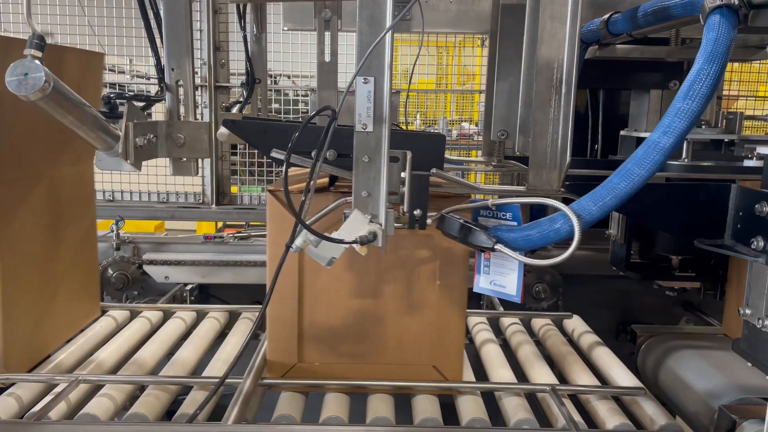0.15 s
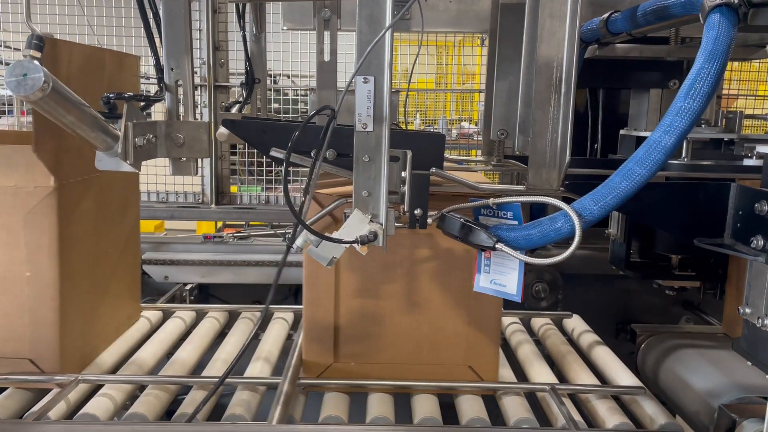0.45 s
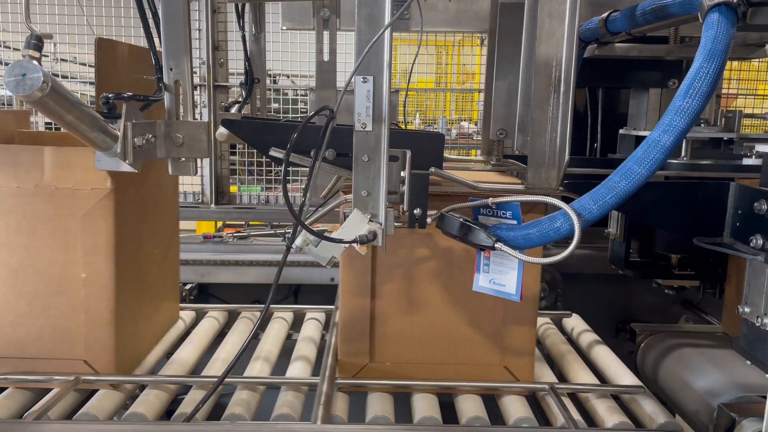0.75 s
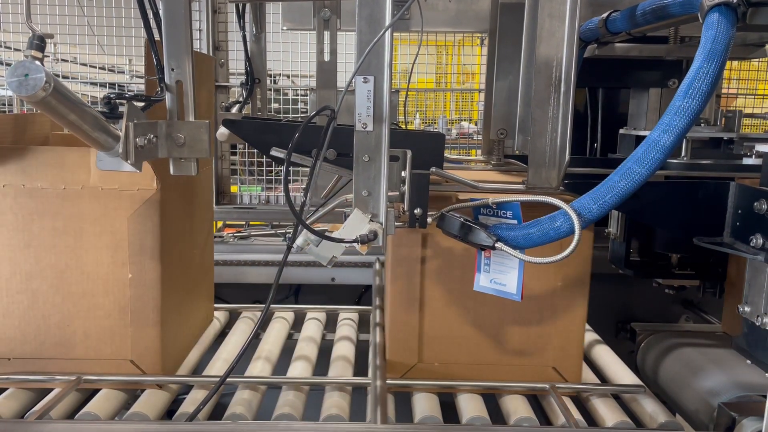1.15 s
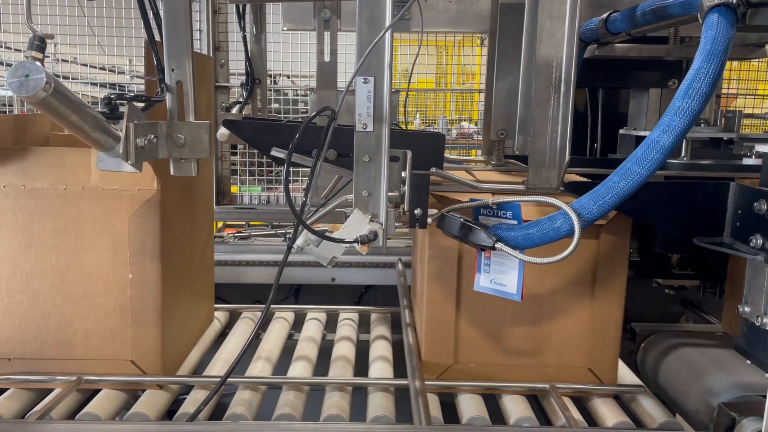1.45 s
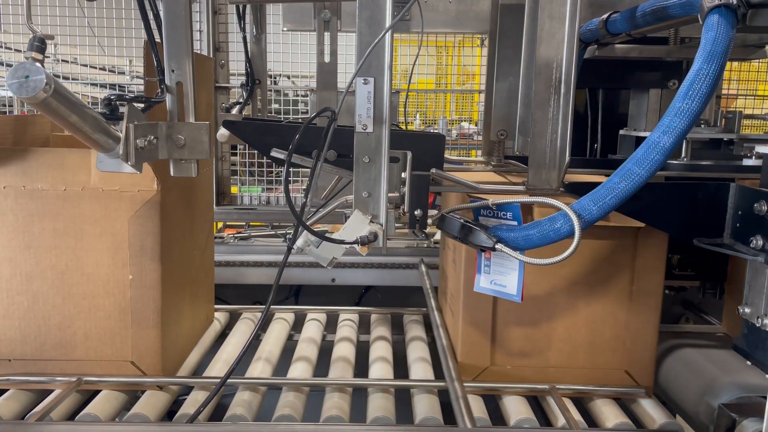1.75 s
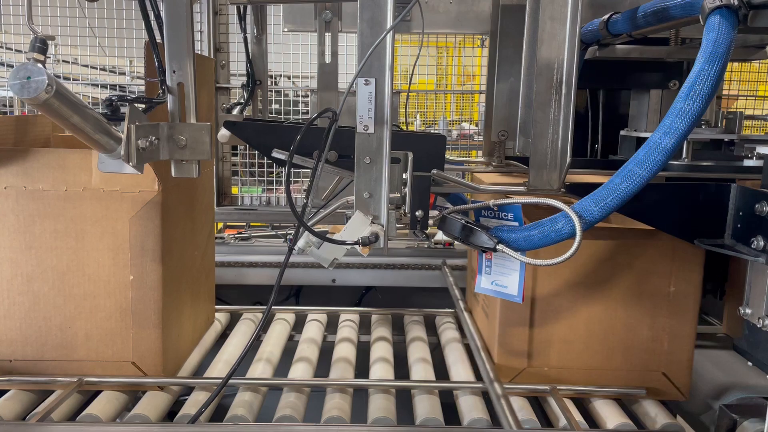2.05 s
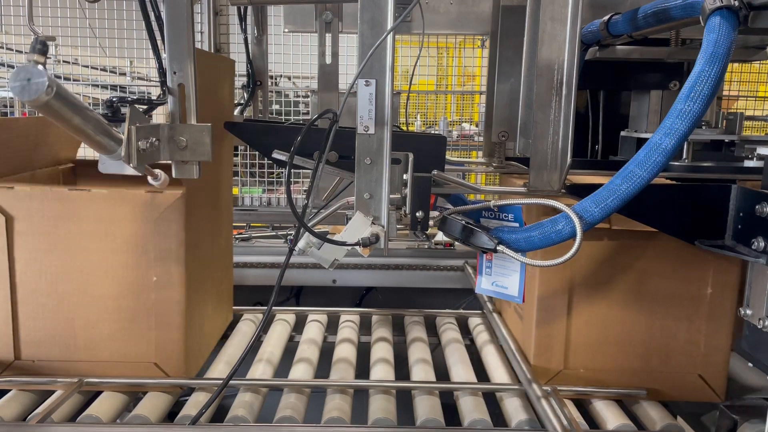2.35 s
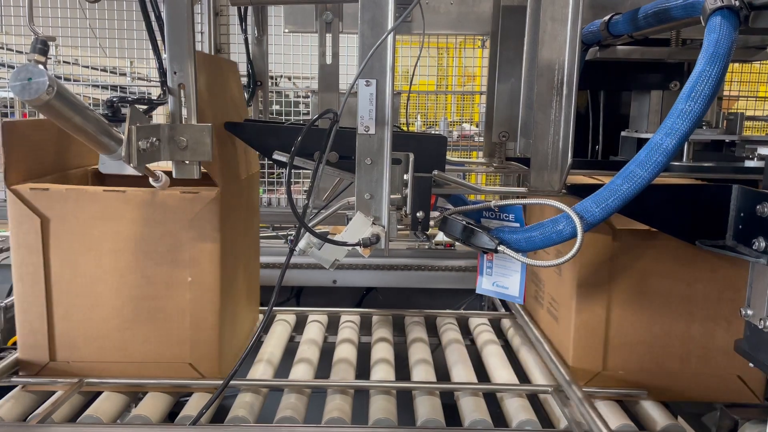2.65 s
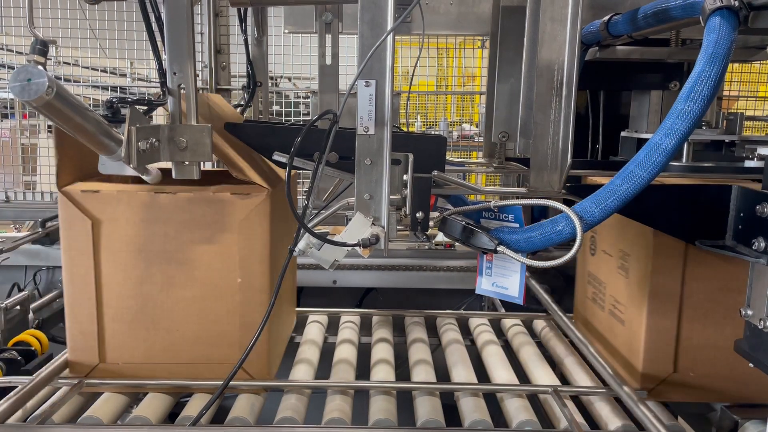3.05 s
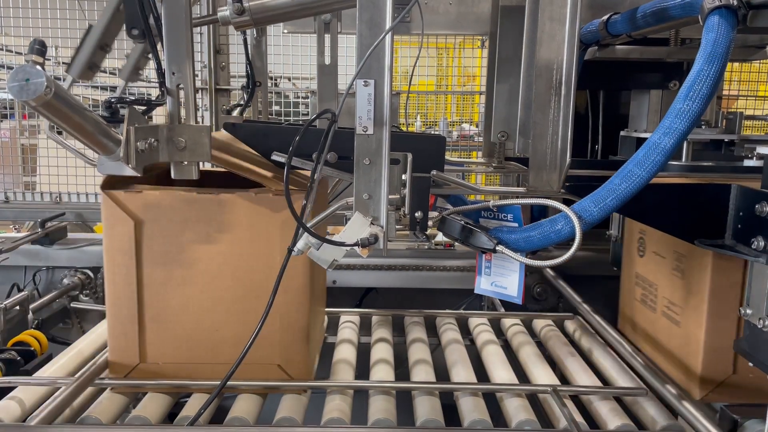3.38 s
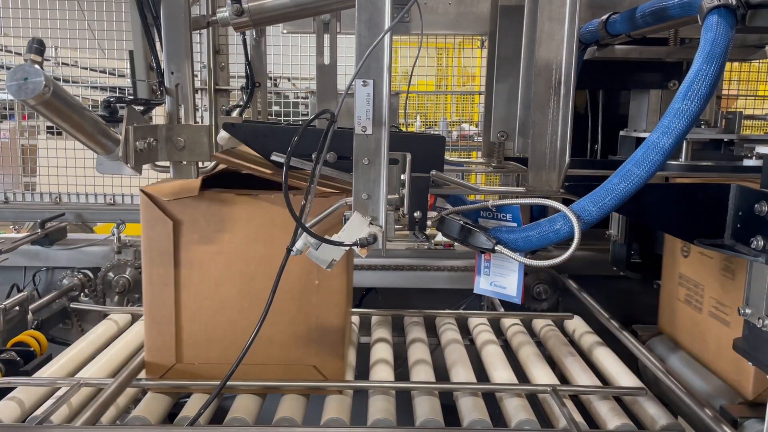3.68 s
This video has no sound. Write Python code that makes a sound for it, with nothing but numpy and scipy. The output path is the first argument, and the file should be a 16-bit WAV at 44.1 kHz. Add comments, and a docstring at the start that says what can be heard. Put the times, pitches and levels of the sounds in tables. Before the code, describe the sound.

Carton sealing machine hums and ticks while valves blast air and a steel arm clanks

```python
"""Factory hall, close to a carton sealer, on a close pair of microphones. Far off, shaped noise rumbles, and
motors and a loaded drive hum as wavering sines. Close by, a chain ticks in noise, cartons and other knocks thud
as decaying sines, a steel arm clanks as ringing modes, and air valves spit, blast, sigh and whistle as gated
noise and sliding tones. A decaying noise tail is the hall's answer; the pair differs in phase and level, which
turns the treble of left against right."""
import sys
import numpy as np
from scipy import signal
from scipy.fft import rfft, irfft, next_fast_len
from scipy.io import wavfile
from scipy.ndimage import map_coordinates

SR = 44100
rng = np.random.default_rng(int(sys.argv[2]) if len(sys.argv) > 2 else 0)


def dump(signal):
    """Clip the signal to [-1, 1] and save it as 16-bit WAV at the path in sys.argv[1]."""
    limited = np.clip(np.atleast_2d(signal).T, -1, 1)
    pcm = np.round(limited * 32767).astype(np.int16)
    wavfile.write(sys.argv[1], SR, pcm)


N = 168462  # length [samples]
TIME = np.arange(N) / SR  # [s]
SHARED_ONLY = np.array([[1], [0]])  # into the part common to both microphones, none into the spread part


def amp(db):
    """Decibels to amplitude."""
    return 10 ** (np.asarray(db) / 20)


def unit(x):
    """Scale to rms 1."""
    return x / np.sqrt(np.mean(x ** 2) + 1e-20)


def along(points, hz):
    """Read (frequency, value) points on a log frequency axis."""
    f, v = np.transpose(points)
    return np.interp(np.log(hz + 1), np.log(f + 1), v)


def curves(rows):
    """One value per sample for each column after the time."""
    s, *columns = np.transpose(rows)
    return [np.interp(TIME, s, column) for column in columns]


def wobble(rate):
    """A smooth random curve through rate knots a second."""
    knots = rng.standard_normal(int(N * rate / SR) + 4)
    return map_coordinates(knots, [np.arange(N) * rate / SR])


def phase(hz):
    """Running phase [rad] of a frequency that changes with time."""
    return 2 * np.pi * np.cumsum(hz) / SR


def filtered(x, response):
    """Multiply the spectrum of x by a complex response of frequency."""
    m = next_fast_len(N + SR // 2)
    return irfft(rfft(x, m) * response(np.fft.rfftfreq(m, 1 / SR)), m)[..., :N]


def noise(spectrum):
    """Two unrelated noises of rms 1, silent beyond the spectrum's ends."""
    def response(hz):
        inside = (hz > spectrum[0][0]) & (hz < spectrum[-1][0])
        return amp(along(spectrum, hz)) * inside
    return unit(filtered(rng.standard_normal((2, N)), response))


def gate(s, rise, hold, t60, db):
    """Linear rise, hold counted from the onset, then exponential release."""
    out = np.zeros(N)
    start = max(round(s * SR), 0)
    stop = min(N, start + round((hold + 1.2 * t60) * SR))
    t = np.arange(start, stop) / SR - s
    release_db = -60 * np.clip(t - hold, 0, None) / t60
    out[start:start + len(t)] = np.clip(t / max(rise, 1e-4), 0, 1) * amp(db + release_db)
    return out


def gates(rows):
    """All the gates of a table together."""
    return sum(gate(*row) for row in rows)


# Far factory floor: (frequency [Hz], density [dB per Hz])
HALL_SPECTRUM = [(28, -79), (50, -52.5), (70, -53.5), (110, -52.5), (180, -57.5), (350, -57.5), (550, -63),
                 (800, -66), (1300, -69), (1700, -69), (2500, -77.5), (4000, -81.5), (6000, -90.5),
                 (10000, -90.5), (16000, -93.5)]
# Its swell, each level heard against its own mean: (time [s], low rumble [dB], roller rush [dB])
HALL_SWELL = [(0.0, -26.5, -27.5), (0.38, -28, -38), (0.58, -29, -38), (0.9, -25.5, -34.5),
              (1.24, -30, -36.5), (1.67, -28, -38.5), (2.15, -27.5, -38.5), (2.45, -33, -37.5),
              (2.61, -27.5, -34.5), (2.88, -27.5, -35.5), (3.11, -35.5, -35.5), (3.36, -30, -37),
              (3.62, -27, -36.5), (3.82, -27.5, -34.5)]
SPLIT_HZ = 900


def hall():
    """Noise of conveyors and the far factory; its low and high parts swell separately."""
    low_db, high_db = curves(HALL_SWELL)
    bed = filtered(rng.standard_normal((2, N)),
                   lambda hz: amp(along(HALL_SPECTRUM, hz)) * np.sqrt(SR / 2) * (hz > 22))
    low = filtered(bed, lambda hz: 1 / (1 + (hz / SPLIT_HZ) ** 4))
    rumble = low * amp(low_db - low_db.mean() + 2.13 * wobble(8.21))
    rush = (bed - low) * amp(high_db - high_db.mean() + 0.78 * wobble(6.18))
    return rumble + rush


# Motor shaft, before doubling: (time [s], level [dB])
SHAFT_LEVEL = [(0.0, -46), (0.22, -47), (0.36, -65), (0.39, -37.5), (0.77, -42.5), (0.94, -50), (0.98, -37),
               (1.27, -28.5), (1.47, -30), (1.57, -35.5), (2.17, -29.5), (2.33, -35), (2.7, -27.5),
               (3.01, -33.5), (3.21, -34), (3.66, -37.5), (3.69, -49), (3.82, -28.5)]
# Shaft orders: (multiple of the shaft rate, relative level [dB])
SHAFT_ORDERS = [(2, -1), (3, -5.5), (4, -10.5), (6, -13), (8, -15.5)]
# Fuzzy hum, before doubling: (time [s], level [dB])
HUM_LEVEL = [(0.0, -40), (0.41, -48), (0.5, -30.5), (0.96, -49), (1.05, -27), (1.53, -51), (1.68, -43),
             (2.29, -29.5), (2.32, -43), (2.74, -47), (2.97, -31), (3.35, -47), (3.61, -32), (3.82, -34)]
# Gear whines, before doubling: (frequency [Hz], level [dB], frequency wander [Hz])
GEAR_WHINES = [(1182, -51, 2), (1289, -49, 70), (360, -43, 30)]
SHAFT_HZ, HUM_HZ, HUM_WIDTH_HZ = 43.62, 67.95, 3.98


def motors():
    """Shaft orders, a fuzzy low hum and thin whines of gears, all wavering sines."""
    turn = phase(SHAFT_HZ * (1 + 0.00404 * wobble(2.98)))
    shaft = sum(amp(db + 1.9 * wobble(5.1)) * np.sin(k * turn + rng.uniform(0, 2 * np.pi))
                for k, db in SHAFT_ORDERS)
    hum = np.sin(phase(HUM_HZ + 0.396 * HUM_WIDTH_HZ * wobble(HUM_WIDTH_HZ)))
    whine = sum(amp(db + 3.24 * wobble(5.09)) * np.sin(phase(hz + wander_hz * wobble(4 * wander_hz)))
                for hz, db, wander_hz in GEAR_WHINES)
    both = amp(curves(SHAFT_LEVEL)[0]) * shaft + amp(curves(HUM_LEVEL)[0]) * hum
    return 2 * (both + whine) * SHARED_ONLY


# Drive under load: (time [s], frequency [Hz], rms level of the low note [dB])
DRIVE_NOTE = [(0.0, 110, -32.5), (0.268, 113.4, -31), (0.706, 109.6, -33), (0.74, 107.2, -54),
              (0.78, 101, -25.5), (0.83, 101.4, -29.5), (0.982, 110, -32), (1.1, 102, -30)]
SING_HZ, SING_DB = 3350, -18.5  # thin whine, level against the low note


def drive():
    """A low note and a thin whine while the belt takes up a carton."""
    hz, db = curves(DRIVE_NOTE)
    note = np.sin(phase(hz))
    whine = amp(SING_DB) * np.sin(phase(SING_HZ + 25 * wobble(59.5)))
    fade = np.clip((DRIVE_NOTE[-1][0] - TIME) / 0.048, 0, 1)  # to silence at the last row
    return np.sqrt(2) * amp(db) * fade * (note + whine) * SHARED_ONLY


# Colour of the chain: (frequency [Hz], relative level [dB])
CHAIN_SPECTRUM = [(1500, -20), (2300, -0.5), (3300, 3.5), (4200, -9), (6000, -17)]
# Extra ticks between the steady ones, some louder, some fainter: (time [s], level [dB])
EXTRA_TICKS = [(0.397, -35), (2.01, -44), (2.104, -41), (2.483, -31), (2.768, -41), (2.959, -39),
               (3.78, -49)]
CHAIN_START_S, CHAIN_GAP_S, CHAIN_DB, CHAIN_T60_S = 0.0415, .0936, -40.5, 0.1


def chain():
    """A link clicks over the sprocket at a steady rate; louder and fainter extra ticks join in."""
    times = np.arange(41) * CHAIN_GAP_S + CHAIN_START_S
    steady = [(s, CHAIN_DB + rng.normal(0, 2.1)) for s in times]
    ticks = sum(gate(s, 0.0024, 0.0027, CHAIN_T60_S, db) for s, db in steady + EXTRA_TICKS)
    return noise(CHAIN_SPECTRUM) * ticks


# Short knocks and ticks: cartons, valve starts, chain ticks and the arm's last contact:
# (time [s], frequency [Hz], level [dB], t60 [s])
SHORT_KNOCKS = [(0.0047, 219, -18.5, 0.18), (0.18, 167, -25, 0.028), (2.243, 350, -19, 0.033),
                (2.252, 434, -26, .04), (.932, 505, -21.5, .1), (.748, 1350, -28.5, .08),
                (2.386, 488, -23, 0.045), (2.401, 270, -19, 0.017), (2.575, 700, -31, .1),
                (2.599, 230, -25, 0.11), (3.6795, 258, -16.5, 0.1), (3.775, 210, -22, 0.073),
                (3.782, 960, -28, 0.052), (3.79, 1300, -29, 0.062), (2.257, 1660, -24, 0.081),
                (2.262, 1440, -23.5, .08), (2.482, 1260, -29.5, 0.036), (2.768, 2480, -33.5, 0.034),
                (2.66, 2700, -34, .03), (2.46, 2370, -34, .03), (3.032, 3700, -31, 0.1),
                (3.1, 1270, -23, .05), (3.785, 2050, -43, .05)]
# Flaps rubbing the guides: (time [s], rise [s], hold [s], t60 [s], level [dB])
FLAP_RUBS = [(2.386, 0.013, 0.072, 0.27, -31), (2.545, 0.021, 0.1, 0.62, -35),
             (3.766, 0.0035, 0.034, 0.1, -37)]
# Colour of slap and rub: (frequency [Hz], relative level [dB])
SLAP_SPECTRUM = [(400, 8), (900, -4), (2500, 1.5), (3800, -3), (5000, -10.5), (8000, -13)]


def knocks_and_rubs():
    """Each knock or tick is a short decaying sine with a noise slap; flaps rub in rough grains."""
    ring = sum(gate(s, 0.0028, 0.0062, t60, db) * np.sin(2 * np.pi * hz * (TIME - s))
               for s, hz, db, t60 in SHORT_KNOCKS)
    slap = noise(SLAP_SPECTRUM) * sum(gate(s, 0.0033, 0.0026, 0.017, db - 13)
                                      for s, hz, db, t60 in SHORT_KNOCKS)
    rub = noise(SLAP_SPECTRUM) * amp(1.6 * wobble(70)) * gates(FLAP_RUBS)
    return ring * np.array([[np.sqrt(2)], [.3]]) + slap + rub  # the ring is mostly shared


# Contacts of the arm: (time [s], level [dB])
ARM_CONTACTS = [(.869, -17), (.876, -19), (.882, -18.5), (.892, -21.5), (.901, -20), (.914, -22),
                (.93, -27)]
# Modes of the steel: (frequency [Hz], relative level [dB], t60 [s])
STEEL_MODES = [(503, -2, 0.16), (690, -7, 0.11), (880, -1, 0.039), (1850, -3.5, 0.062), (2073, -6.5, 0.12),
               (2240, -8, 0.089), (3450, -17, 0.16), (3620, -12, .1), (3830, -10.5, 0.11),
               (4240, -8.5, 0.12), (4050, -11, .08), (4790, -9, 0.12), (5185, -15.5, 0.35),
               (6500, -21, 0.15), (6850, -13, .06), (7870, -16, .07), (10450, -19, .08),
               (12950, -10, 0.071)]
# Colour of the crack: (frequency [Hz], relative level [dB])
CRACK_SPECTRUM = [(200, -20), (500, 2), (900, 6.5), (2000, 2), (4500, -1.5), (5600, -13), (7000, -11),
                  (14000, -17)]
CRACK_DB, CRACK_T60_S = -3, 0.064  # crack level against the contact
MODE_SCATTER = .001  # random relative detuning at each contact


def arm():
    """The steel arm rattles home: every contact cracks and rings its modes anew."""
    rings = np.zeros((2, N + SR))
    t = np.arange(SR // 3) / SR
    onset = 1 - np.exp(-t / 0.00085)
    for s, db in ARM_CONTACTS:
        ring = 0
        for hz, level, t60 in STEEL_MODES:
            decay = amp(level + rng.normal(0, 2.9) - 60 * t / t60)
            mode_hz = hz * (1 + MODE_SCATTER * rng.normal())
            ring = ring + decay * np.sin(2 * np.pi * mode_hz * t + rng.uniform(0, 2 * np.pi, (2, 1)))
        start = round(s * SR)
        rings[:, start:start + len(t)] += amp(db) * ring * onset
    cracks = sum(gate(s, 0.0018, 0.00053, CRACK_T60_S, db + CRACK_DB) for s, db in ARM_CONTACTS)
    return rings[:, :N] + noise(CRACK_SPECTRUM) * cracks


# Bright spits of air: (time [s], rise [s], hold [s], release t60 [s], level [dB])
AIR_SPITS = [(.1812, .0015, .006, .018, -17), (.6805, .0015, .006, .018, -17),
             (2.478, .003, .012, .05, -36)]
# Colour of the spits: (frequency [Hz], relative level [dB])
SPIT_SPECTRUM = [(300, -10), (1300, -6), (2500, -6), (4000, -10), (6000, -6), (8000, -2), (10500, -3),
                 (13000, 0), (16000, 0)]
# Plunger slamming home, broad and dull: (time [s], rise [s], hold [s], release t60 [s], level [dB])
PLUNGER_SLAMS = [(.181, .0005, .008, .08, -25.5), (.4738, .0003, .003, .11, -30.5),
                 (.6793, .0003, .007, .11, -22.5), (2.256, .001, .03, .1, -30)]
# Colour of the slams: (frequency [Hz], relative level [dB])
SLAM_SPECTRUM = [(400, -3), (1300, 2), (2200, -3), (3300, 0), (4800, -1), (7000, -9), (9000, -20)]


def snaps():
    """Valves switching: bright spits of air and the plunger's slams, both gated noise."""
    return noise(SPIT_SPECTRUM) * gates(AIR_SPITS) + noise(SLAM_SPECTRUM) * gates(PLUNGER_SLAMS)


# Thin hiss of a valve cracking open: (time [s], rise [s], hold [s], release t60 [s], level [dB])
VALVE_OPENINGS = [(.166, .002, .005, .06, -35), (.665, .002, .007, .06, -33), (.085, .004, .012, .08, -35),
                  (.470, .002, .004, .03, -40), (2.993, .003, .016, .05, -42),
                  (3.022, .004, .008, .03, -34)]
# Colour of the thin hiss: (frequency [Hz], relative level [dB])
THIN_SPECTRUM = [(3000, -14), (6500, -8), (9000, -8), (12000, -3), (16000, -10)]
# Long blasts, before kick and sag: (time [s], rise [s], hold [s], release t60 [s], level [dB])
AIR_BLASTS = [(2.251, 0.007, .17, 0.11, -19.5), (3.028, 0.005, 0.18, 0.05, -22)]
# Colours of the first and second blast: (frequency [Hz], relative level [dB])
FIRST_BLAST_SPECTRUM = [(300, -22), (800, -2.5), (1300, 2), (1700, -5.5), (2500, 0), (4000, -8.5),
                        (6000, -8), (8000, -7.5), (10500, 6), (12000, -3), (13500, -6), (14800, -2),
                        (16000, -18)]
SECOND_BLAST_SPECTRUM = [(300, -5), (800, -7.5), (1300, -6), (1600, -8), (2500, -5), (4000, -6.5),
                         (6000, -7.5), (7000, -6.5), (8000, -9.5), (9300, -1.5), (10800, 3.5), (12000, -11),
                         (13500, -12), (14800, -9), (16000, -9)]
# Soft leaks: (time [s], rise [s], hold [s], release t60 [s], level [dB])
AIR_SIGHS = [(-.05, .01, 0.16, 0.32, -32), (0.742, 0.013, 0.043, 0.72, -27.5),
             (1.685, .01, 0.045, 0.34, -44), (3.207, 0.026, 0.47, 0.56, -35.5)]
# Colour of the leaks: (frequency [Hz], relative level [dB])
SIGH_SPECTRUM = [(300, -38), (1300, 6), (1700, -8.5), (2500, 4.5), (4000, -1), (6800, 0), (8000, -3),
                 (10000, -4), (13000, -6.5), (16000, -1)]
KICK_DB, KICK_S, SAG_DB_PER_S = 5, 0.038, -12.5  # louder start of a blast, then its sag
FLUTTER_HZ, FLUTTER_DB = 82.4, 0.5  # during the kick


def push(since):
    """A blast's gain: a fluttering kick at the start and a steady sag."""
    kick_db = KICK_DB - FLUTTER_DB * np.cos(2 * np.pi * FLUTTER_HZ * since)
    return amp(kick_db * (since < KICK_S) + SAG_DB_PER_S * since.clip(0, 1))


def valves():
    """Jets of air as gated noise: thin hisses, rough sagging blasts and soft leaks."""
    thin = noise(THIN_SPECTRUM) * gates(VALVE_OPENINGS)
    colours = (FIRST_BLAST_SPECTRUM, SECOND_BLAST_SPECTRUM)
    blasts = sum(noise(colour) * gate(*row) * push(TIME - row[0])
                 for row, colour in zip(AIR_BLASTS, colours))
    roughness = amp(.9 * wobble(60) + 1.5 * wobble(900))
    sighs = noise(SIGH_SPECTRUM) * amp(0.27 * wobble(25.3)) * gates(AIR_SIGHS)
    return thin + blasts * roughness + sighs


# Singing nozzle: (time [s], hold [s], release t60 [s], first frequency [Hz], last frequency [Hz],
# slide time constant [s], level before sag [dB], frequency jitter [Hz],
# octave [dB against the note], twelfth [dB against the note])
NOZZLE_NOTES = [(3.033, .03, .04, 5700, 5400, .03, -28.5, 200, 9, -8),
                (3.058, .152, .35, 5080, 4720, .09, -28, 110, 1, 0),
                (.748, .032, .06, 6300, 3500, .035, -28, 300, -14, -20),
                (.812, .04, .08, 4100, 3800, .04, -32, 250, -20, -25)]
WHISTLE_SAG_DB_PER_S = -25


def whistles():
    """The nozzle sings a breathy note with overtones that slides down as the pressure falls."""
    out = np.zeros((2, N))
    for s, hold, t60, first_hz, last_hz, slide, db, jitter_hz, *over_db in NOZZLE_NOTES:
        glide_hz = last_hz + (first_hz - last_hz) * np.exp(-(TIME - s).clip(0) / slide)
        sag_db = WHISTLE_SAG_DB_PER_S * (TIME - s - hold / 2).clip(-1, 1)
        for part in out:  # shared and spread parts jitter apart
            turn = phase(glide_hz + jitter_hz * wobble(1500))
            part += gate(s, 0.0035, hold, t60, db) * np.sin(turn) * amp(sag_db + 1.2 * wobble(150))
            for k, level in enumerate(over_db, 2):
                breath = amp(sag_db + 2.5 * wobble(400))
                part += gate(s, .004, hold, .04, db + level) * np.sin(k * turn) * breath
    return out


# The hall's answer: (frequency [Hz], t60 [s])
ROOM_T60 = [(200, 0.71), (2000, 1), (6000, 0.85), (12000, 0.13)]


def room(x):
    """Noise tail, 400 samples late, in which each frequency dies at its own speed."""
    hz, t, grid = signal.stft(rng.standard_normal((2, SR)), SR, nperseg=256)
    decay = amp(-60 * t / along(ROOM_T60, hz)[:, None])
    tail = signal.istft(grid * decay, SR, nperseg=256)[1]
    late = np.pad(x, ((0, 0), (400, 0)))
    return signal.fftconvolve(late, tail / np.linalg.norm(tail[0]), axes=1)[:, :N]


# Reflections of the air jets off the frame: (delay [s], level [dB])
FRAME_REFLECTIONS = [(.0009, -25.5), (.0021, -19.5), (.0037, -13.5), (.0064, -10)]
# Likeness of left and right for equal, unrelated parts: (frequency [Hz], correlation [-1 to 1])
LIKENESS = [(60, .98), (160, .95), (300, .8), (600, .5), (1500, .45), (3000, .55), (5500, .45), (6900, .65),
            (8000, .97), (16000, .97)]
ROOM_DB = -12


def scene():
    """Near sources, the hall's answer and the background, mixed from shared and spread parts."""
    def frame(hz):
        return 1 + sum(amp(db) * np.exp(-2j * np.pi * hz * s) for s, db in FRAME_REFLECTIONS)

    def weights(hz):
        half = np.arccos(np.clip(along(LIKENESS, hz), -1, 1)) / 2
        return np.array([np.cos(half), np.sin(half)])

    near = chain() + knocks_and_rubs() + arm() + snaps() + filtered(valves(), frame) + whistles()
    field = hall() + motors() + drive() + near + amp(ROOM_DB) * room(near)
    mid, side = filtered(field, weights)
    return np.array([mid + side, mid - side])


# Level of left over right: (frequency [Hz], difference [dB])
PAIR_LEVEL = [(60, -1.2), (300, -1), (700, 2.5), (2400, 1.5), (5500, 2.5), (8000, 0), (16000, 0)]
# Phase of left ahead of right: (frequency [Hz], difference [rad])
PAIR_PHASE = [(0, 0), (300, 0), (550, .75), (1400, 1), (1720, 3.9), (2240, 6.1), (3100, 7.6), (3800, 6.6),
              (4650, 6.8), (5500, 6.3), (6900, 5.1), (8700, np.pi), (11200, 1.57), (12230, .9),
              (13260, .16), (16000, 0)]
TOP_HZ = 15750  # nothing passes above


def record(dry):
    """The two microphones differ in phase and level by frequency, up to a sharp band limit."""
    ears = np.array([[.5], [-.5]])  # half of each difference to either side

    def pair(hz):
        turn = np.exp(1j * ears * along(PAIR_PHASE, hz))
        return amp(ears * along(PAIR_LEVEL, hz)) * turn * (hz < TOP_HZ)
    return filtered(dry, pair)


dry = scene()
out = record(dry)
dump(out)
```